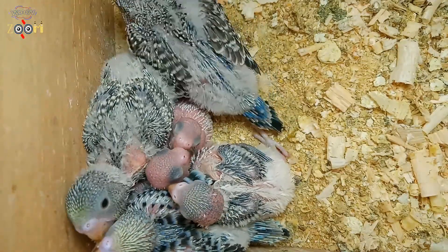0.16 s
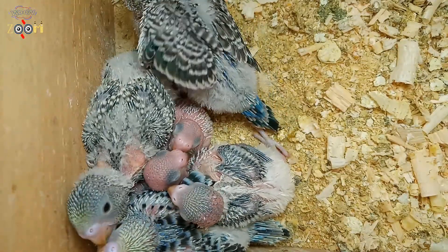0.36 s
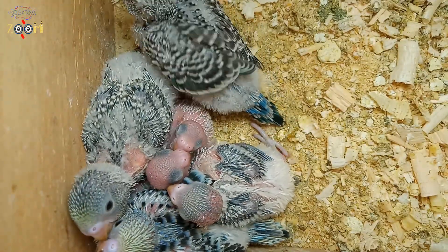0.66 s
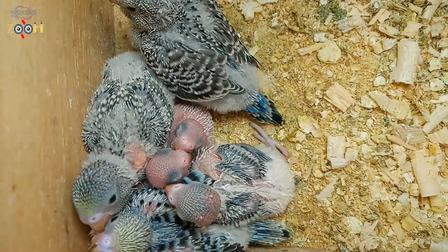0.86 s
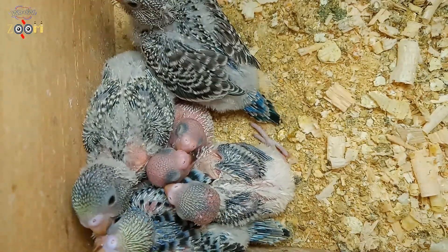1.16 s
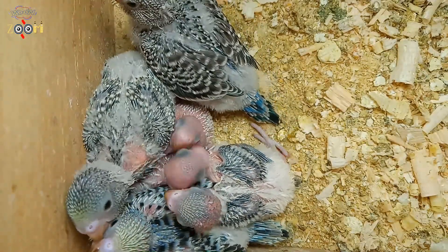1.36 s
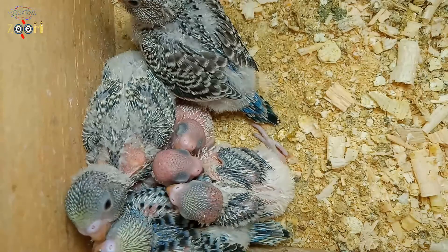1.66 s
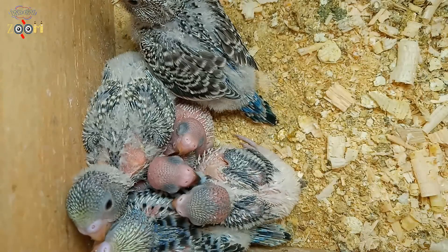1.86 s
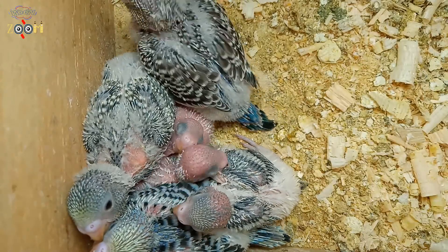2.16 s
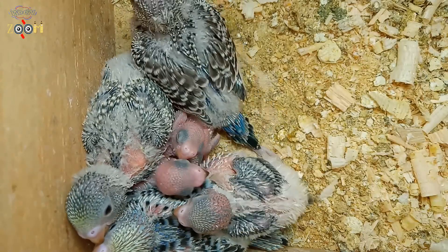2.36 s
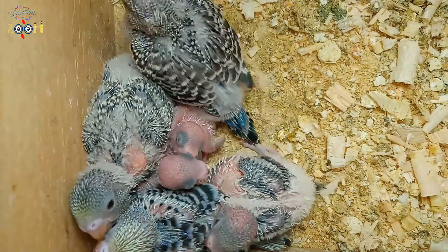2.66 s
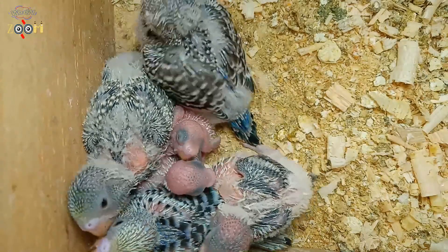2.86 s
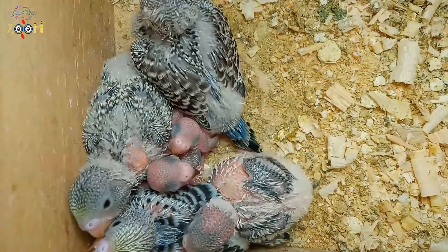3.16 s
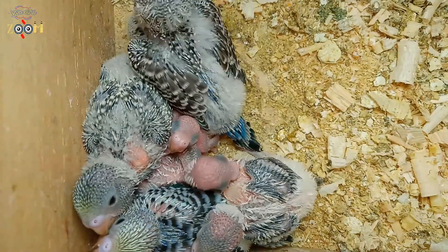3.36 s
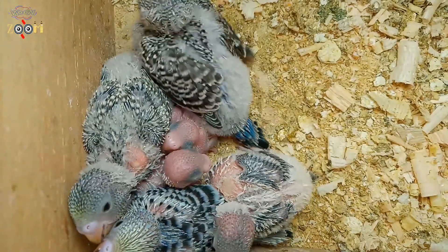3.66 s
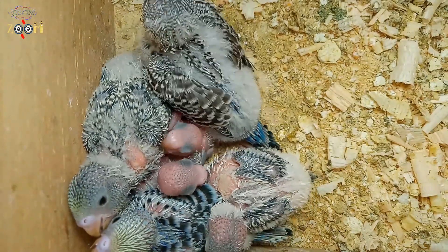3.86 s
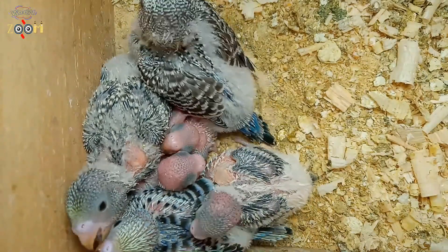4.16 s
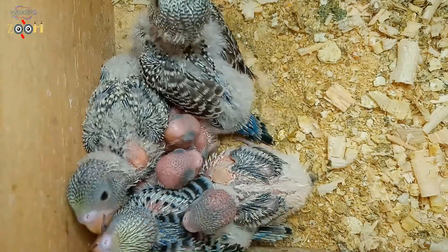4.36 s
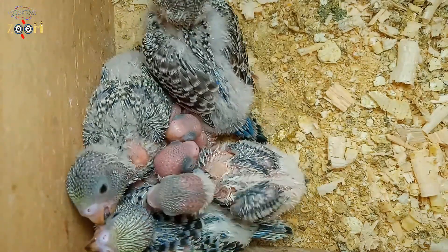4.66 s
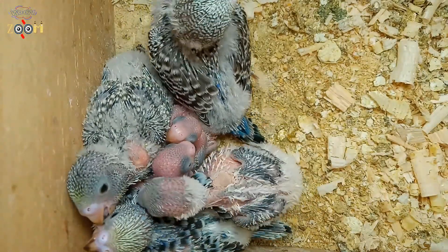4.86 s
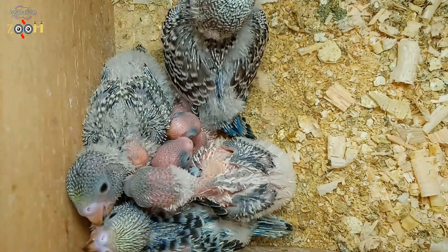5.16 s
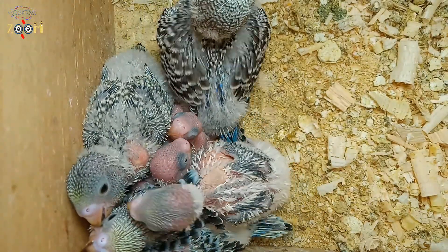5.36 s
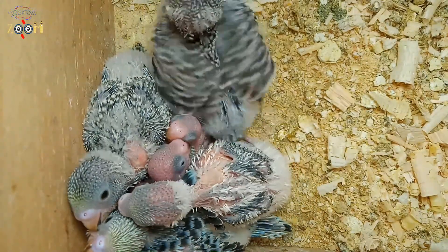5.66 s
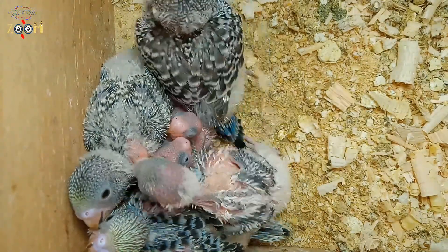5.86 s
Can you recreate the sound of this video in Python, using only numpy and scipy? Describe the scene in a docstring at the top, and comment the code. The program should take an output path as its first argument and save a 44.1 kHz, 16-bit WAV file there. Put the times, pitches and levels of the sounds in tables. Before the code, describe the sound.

A phone placed close in a nest box picks up young budgies: a clipped warble early on, dull claw taps, soft sine-like chick peeps, low croaks with scratching in shavings, then a livelier mix of sharp chirps and harsh little squawks. Behind them a reverberant flock whistles and chatters, growing busier, above a droning building rumble. The highest treble is dulled.

```python
"""Budgies in a bare, echoing bird room, heard from inside a wooden nest box by a phone.
Far whistles and chatter ring from the start, heard only as echo, over air noise and a swelling low rumble.
A bird close by squawks, then warbles (0.4-1 s); claws scrabble and tap the box from 1.4 s, as filtered
grains and ringing walls. A chick peeps in gliding sine tones (2.3-3.1 s), low warbled notes and more
scrabbling follow, and from 4.4 s warble, peeps and squawks alternate, with two last taps at the end."""
import sys
import numpy as np
from scipy import signal
from scipy.fft import rfft, irfft, next_fast_len
from scipy.io import wavfile
from scipy.ndimage import uniform_filter1d

SR = 44100
rng = np.random.default_rng(int(sys.argv[2]) if len(sys.argv) > 2 else 0)


def master(y):
    """Save y as 16-bit WAV."""
    cut = np.clip(np.atleast_2d(y).T, -1, 1)
    pcm = np.round(cut * 32767)  # scale
    wavfile.write(sys.argv[1], SR, pcm.astype(np.int16))


N = 265482
LEAD_S = .5  # tracks start this early, so that earlier calls still ring


def undb(db):
    """Turn decibels into an amplitude factor."""
    return 10 ** (np.asarray(db) / 20)


def colour(x, points):
    """Filter by (frequency [Hz], gain [dB]) points joined on a log-frequency axis."""
    hz, db = np.transpose(points)
    size = next_fast_len(x.shape[-1])
    f = np.maximum(np.arange(size // 2 + 1) * SR / size, 1)
    gain = undb(np.interp(np.log(f), np.log(hz), db))
    return irfft(rfft(x, size) * gain, size)[..., :x.shape[-1]]


def add(track, s, sound):
    """Lay a sound at s seconds on a track that starts LEAD_S early."""
    i = int((s + LEAD_S) * SR)
    sound = sound[:len(track) - i]
    track[i:i + len(sound)] += sound


def note(length, hz, turn, db, second_db, third_db, rough=0., edge=0.49, shakes=500., fourth_db=0.0):
    """A syrinx tone gliding through three pitches, loudest at the turn; roughness shakes pitch and size."""
    u = np.arange(int(length * SR) + 2) / (length * SR + 2)
    turn = np.clip(turn, .1, .9)
    # random values, shakes a second, joined by straight lines
    pitch_shake, size_shake = [np.interp(u * length * shakes, np.arange(128), row)
                               for row in rng.standard_normal((2, 128))]
    glide = uniform_filter1d(np.interp(u, [0, turn, 1], hz), len(u) // 5 + 1, mode="nearest")
    pitch = glide * (1 + 0.1504 * rough * pitch_shake)
    phase = 2 * np.pi * np.cumsum(pitch) / SR
    # fourth_db is relative to the third harmonic, the others to the first
    harmonics_db = [0, second_db, third_db, third_db + fourth_db]
    tone = 0
    for k, harmonic_db in enumerate(harmonics_db, 1):
        audible = k * pitch < 10000
        tone = tone + undb(harmonic_db) * audible * np.sin(k * phase)
    # a smaller edge makes the swell squarer, a larger one steeper
    swell = np.sin(np.pi * np.interp(u, [0, turn, 1], [0, .5, 1])) ** edge
    return undb(db) * swell * (1 + rough * size_shake) * tone


def room(x, gap_s, rise_s, first_db=0):
    """Echoes after a first gap, uneven slaps at first, then dense; each band dies at its own rate."""
    # decay of the bare room: (band centre [Hz], time to fall 60 dB [s])
    band_decays = [(1000, 1.65), (2500, 2.34), (4500, 1.22), (7500, 1.2)]
    slap_db = 4.5  # spread of the slaps at the start
    t = np.arange(int(1.6 * SR)) / SR
    noise = rfft(rng.standard_normal(len(t)))
    log_hz = np.log(np.arange(len(t) // 2 + 1) * SR / len(t) + 1)
    centres = np.log([hz for hz, _ in band_decays])
    echo = 0
    for k, (_, t60) in enumerate(band_decays):
        share = np.interp(log_hz, centres, np.eye(len(centres))[k])
        echo = echo + irfft(noise * share, len(t)) * 10 ** (-3 * t / t60)
    # the near walls answer in separate slaps that blur with time
    slaps = np.interp(t * 300, np.arange(500), rng.standard_normal(500))
    echo *= undb((-0.5 + slap_db * slaps) * np.exp(-t / 0.18))
    echo *= 1 - np.exp(-t / rise_s)
    echo *= undb(first_db * np.exp(-t / .02))  # extra level for the earliest echoes
    echo = np.r_[np.zeros(int(gap_s * SR)), echo * np.sqrt(10 / SR)]
    return signal.fftconvolve(x, echo)[:len(x)]


def chick(track):
    """Thin, slightly unsteady sine whistles, most arching up to a top; too soft to wake the room."""
    # peeps: (time [s], length [s], start [Hz], top [Hz], end [Hz], place of the top [share 0-1],
    #         dip of pitch at the top [Hz], level before start and flutter [dB], swell in the fall [dB])
    peeps = [(2.289, .127, 3480, 4520, 4300, .6, 270, -36, 3),
             (2.446, .024, 4200, 4270, 3750, .4, 0, -38, 0), (2.496, .013, 3700, 3720, 3000, .2, 0, -35, 1),
             (2.893, .171, 3580, 4350, 3380, .545, 320, -35, 0),
             (4.688, .078, 3640, 4330, 4300, .9, 0, -39.5, -2),
             (4.777, .017, 4250, 4280, 3470, .3, 0, -37, 6),
             (5.278, .128, 3700, 4740, 3600, .75, 0, -40, 8),
             (5.815, .107, 4020, 4420, 3750, .82, 0, -37, 11)]
    catch_s, start_db = .015, -1.5  # width of the dip; level at the start against the top
    for s, length, start_hz, top_hz, end_hz, top, catch_hz, db, swell_db in peeps:
        t = np.arange(0, length, 1 / SR)
        fade = np.clip(np.minimum(t, length - t) / 0.0011, 0, 1)
        waver, flutter = (np.interp(t * 160, np.arange(128), row) for row in rng.standard_normal((2, 128)))
        rise = np.clip(1 - t / (top * length), 0, 1)  # 1 at the start, 0 at the top
        fall = np.clip((t / length - top) / (1 - top), 0, 1)  # 0 at the top, 1 at the end
        arch = top_hz - (top_hz - start_hz) * rise ** 2 - (top_hz - end_hz) * fall ** 2.1
        pitch = arch - catch_hz * np.exp(-((t - top * length) / catch_s) ** 2)
        pitch = pitch * (1 + .006 * waver)
        loud = undb(db + start_db * rise + swell_db * fall) * undb(2.5 * flutter)
        add(track, s, fade * loud * np.sin(2 * np.pi * np.cumsum(pitch) / SR))
    return track


def neighbour(track):
    """Sweet syrinx notes, rough when low, steep when they peak late, and throbbing harsh squawks.

    Rows of the track: as heard, as sent to the room.
    """
    # warble close by: (start [s], end [s], start [Hz], turn [Hz], end [Hz], place of the turn [share 0-1],
    #                   level of the first harmonic [dB], second harmonic against the first [dB])
    warble = [(.403, .419, 2100, 1370, 1320, .25, -32.5, -1), (.431, .442, 2950, 2850, 2500, .75, -30, -15),
              (.444, .455, 2870, 2600, 2500, .6, -33, -14), (.456, .464, 2600, 2800, 3000, .5, -36, -20),
              (.465, .479, 1740, 1800, 2200, .55, -32, 5), (.478, .497, 2250, 2500, 2880, .6, -26.5, -6),
              (.497, .508, 3000, 3300, 3400, .5, -33, -8), (.518, .531, 1060, 990, 950, .55, -29.5, -14),
              (.87, .875, 2800, 2950, 3000, .4, -26, -15), (0.885, 0.905, 2490, 2430, 2390, 0.4, -35, -15),
              (0.927, 0.954, 1720, 1740, 1650, 0.65, -33, -2), (.958, .981, 2280, 2560, 3000, .7, -18, -17),
              (.989, 1.004, 1483, 1620, 1700, .4, -34, 9), (3.527, 3.552, 790, 969, 1080, 0.45, -34, -28),
              (3.734, 3.763, 835, 1053, 868, 0.3, -32, -11), (3.954, 3.991, 783, 973, 1148, .4, -34.5, -1),
              (4.221, 4.246, 1327, 1354, 1290, 0.3, -37.5, -27),
              (4.467, 4.479, 1000, 1020, 1000, .55, -30.5, -8),
              (4.477, 4.485, 2850, 2700, 2600, .5, -31, -20),
              (4.502, 4.513, 3450, 3150, 2450, .3, -29, -18),
              (4.511, 4.535, 2420, 2630, 2450, .45, -27.5, -18),
              (4.532, 4.541, 1950, 1615, 1246, 0.7, -36, -22),
              (4.539, 4.558, 3100, 3350, 3150, .87, -10, -28), (4.562, 4.582, 1300, 950, 2200, .3, -32, -4),
              (4.833, 4.86, 2280, 2440, 1880, .2, -29.5, -30),
              (4.846, 4.859, 2750, 3100, 3400, .6, -34, -30),
              (4.862, 4.883, 2560, 2390, 2420, .6, -28.5, -30),
              (4.88, 4.894, 2450, 2880, 2900, .5, -32, -30), (4.896, 4.907, 1310, 1290, 1300, .5, -31, -10),
              (4.906, 4.927, 1480, 1800, 2160, .7, -35, 3),
              (5.258, 5.278, 1246, 1390, 1860, 0.7, -41.5, -14),
              (5.303, 5.334, 2900, 2560, 2420, .7, -26, -22), (5.329, 5.338, 2000, 1950, 1720, .4, -35, 5),
              (5.789, 5.812, 2500, 2620, 2760, .7, -27, -12),
              (5.826, 5.844, 3880, 3700, 3600, .5, -21, -25),
              (5.848, 5.866, 1430, 1400, 1330, .4, -31.5, -10),
              (5.88, 5.893, 3500, 3630, 3600, .65, -19, -12)]
    # harsh squawks close by: (time [s], length [s], pitch [Hz], level of the first harmonic [dB],
    #                          second harmonic against the first [dB])
    squawks = [(0.13, 0.013, 1400, -54.5, 5.5), (3.92, 0.052, 1702, -46.5, 2.5), (4.193, .02, 1722, -47, 6),
               (4.294, 0.011, 1550, -37, 7), (4.318, 0.0073, 1475, -44, 16), (5.487, 0.015, 1525, -26, 8),
               (5.644, 0.018, 1245, -36.5, 12)]
    aimed_db = -15  # warble above this level is aimed at the phone: the room gets no more of it
    # third harmonic against the second; a squawk's is given at 1 kHz and rises with pitch
    sweet_third_db, squawk_third_db, squawk_db_per_khz = -10.5, -10, 25.5
    rasp_hz, rasp_depth = 95, .7
    for s, end, start_hz, turn_hz, end_hz, turn, db, over_db in warble:
        low = turn_hz < 1100
        croak = .12 + .25 * low
        swell = .4 + 22 * max(turn - .7, 0)
        sung = note(max(end - s, 1 / 250), [start_hz, turn_hz, end_hz], turn, db, over_db,
                    over_db + sweet_third_db, rough=croak, edge=swell, fourth_db=-19)
        add(track[0], s, sung)
        # the room gets 4 dB less of the low croaks
        add(track[1], s, sung * undb(min(aimed_db - db, 0) - 4 * low))
    for s, length, hz, db, over_db in squawks:
        third_db = over_db + squawk_third_db + squawk_db_per_khz * (hz / 1000 - 1)
        squawk = note(length, [hz, hz, hz], .1, db, over_db, third_db, rough=.55, edge=.7, shakes=1400.)
        throb = 1 + rasp_depth * np.sin(2 * np.pi * rasp_hz * np.arange(len(squawk)) / SR)
        squawk = squawk * throb / (1 + rasp_depth)
        for row in track:
            add(row, s, squawk)
    return track


def far_birds(size):
    """Loud calls from three perches with echoes of their own, over the rough chatter of the flock."""
    # far calls, levels before the room: (time [s], start [Hz], end [Hz], level of the first harmonic [dB],
    #                                     second harmonic against the first [dB])
    calls = [(-.1, 2480, 2860, -43.5, 5.5), (-.15, 3280, 3500, -49, 6.5), (-.06, 1070, 1088, -33, -9.5),
             (.14, 2132, 2447, -34, 0), (.525, 2457, 2666, -28.5, -17), (.84, 2990, 2515, -34.5, -37),
             (.985, 3286, 2664, -48, -41.5), (1.01, 1173, 1368, -34.5, -23), (1.38, 1390, 1720, -36, -31),
             (1.49, 2049, 1964, -33, 6.5), (1.5, 2403, 2770, -35.5, -0.5), (1.74, 2880, 3140, -29, -9.5),
             (1.74, 2324, 2413, -31.5, -7), (1.748, 3150, 3610, -25, -16), (1.8, 3680, 4104, -27, -26),
             (1.835, 3130, 3907, -32.5, -20), (1.82, 1510, 1198, -40, -21), (1.81, 2117, 1848, -30, -8.5),
             (2.0, 3167, 3680, -36, -6), (2.2, 4150, 4680, -41, -20), (2.17, 1822, 1994, -35, 1),
             (2.283, 3115, 2760, -26.5, -1), (2.4, 2750, 2320, -29, -5), (2.432, 2500, 2468, -21.5, -2),
             (2.56, 2030, 1738, -30.5, -4), (2.79, 4250, 3820, -34.5, -20), (2.83, 3580, 3323, -27, -8.5),
             (2.85, 2935, 2852, -24, -17), (2.86, 2707, 2324, -34, -26.5), (3.07, 2680, 2960, -27.5, -6),
             (3.125, 3540, 3435, -24, -3), (3.165, 3840, 3470, -27, -12), (3.18, 2226, 2387, -31, -1),
             (3.3, 1960, 1776, -38.5, -13.5), (3.45, 1800, 2226, -33.5, -17), (3.72, 2542, 2420, -29, -15),
             (3.91, 3140, 3690, -31, -6.5), (3.98, 722, 1009, -39.5, 8.5),
             (4.002, 3160, 3024, -19.5, -12.5), (4.05, 2962, 2534, -26.5, -9),
             (4.175, 3460, 2694, -30, -11), (4.57, 2935, 2440, -40.5, -1.5), (4.575, 3490, 2982, -27, -12),
             (4.72, 2213, 2510, -41, 7), (4.9, 3045, 2524, -33.5, -8.5), (4.92, 4224, 4150, -30.5, -44),
             (5.08, 1960, 2102, -29, -9.5), (5.102, 2756, 2897, -22.5, -27.5),
             (5.15, 3160, 2937, -27.5, -18.5), (5.36, 2727, 2204, -28.5, -7.5),
             (5.48, 3630, 3690, -24.5, -10), (5.485, 3230, 2427, -30, 1), (5.66, 2472, 3225, -31, -14),
             (5.92, 3650, 2832, -21.5, -21), (5.885, 2400, 2880, -19.5, -6.5)]
    flock_db, calls_a_second = -49.5, 90  # level of the softest chatter, before the room
    whistle_s, slide_s_per_octave = 0.02554, .12  # length of a level call; sliding ones last longer
    peak_share, third_db = .12, -2.5  # where a call is loudest; third harmonic against the second
    perches = np.zeros((3, size))
    chance = rng.random((int(calls_a_second * size / SR), 5))
    for when, pitch, glide, loud, long in chance:
        hz = 1000 * undb(11 * pitch ** .7)
        chirp = note(0.0042 + 0.0366 * long, [hz, hz * (0.87 + .45 * glide), hz], 0.577,
                     flock_db + 6 * loud, -13.5, -25.0, rough=0.648)
        add(perches[0], when * size / SR - LEAD_S, chirp)
    for k, (s, start_hz, end_hz, db, over_db) in enumerate(calls):
        length = whistle_s + slide_s_per_octave * abs(np.log2(end_hz / start_hz))
        # level whistles are clean, sliding calls rasp
        rough = min(.07 + 4 * abs(np.log(end_hz / start_hz)), .6)
        call = note(length, [start_hz, (start_hz + end_hz) / 2, end_hz], peak_share, db, over_db,
                    over_db + third_db, rough=rough)
        add(perches[k % 3], s, call)
    return sum(room(perch, 0, 0.008, first_db=1) for perch in perches)


def claws(track):
    """A tap sets the box walls ringing in damped sines; scrabbling is a run of uneven dull grains."""
    # claws on the box: (time [s], level before tap_gain_db [dB])
    taps = [(1.811, -50), (1.956, -54), (2.198, -47.5), (2.496, -47), (2.718, -50), (2.898, -54),
            (3.022, -49), (3.141, -54), (3.323, -44.5), (5.7, -53.5), (5.984, -50)]
    # claws in the shavings: (time [s], length [s], RMS level with its short tail [dB])
    scrabbles = [(1.368, 0.045, -47.5), (3.532, 0.032, -51), (3.681, .09, -41), (3.887, .14, -41),
                 (4.035, 0.16, -50)]
    # relative tint of the scrabbling: (frequency [Hz], gain [dB])
    scrape_tint = [(400, -44), (650, -4.5), (1000, -2.5), (1400, -10.5), (2500, -7.5), (6000, -33.5)]
    # box wall resonances: (frequency [Hz], mean level against the tap [dB], time to fall 60 dB [s])
    walls = [(688, 4, 0.06), (940, 5.5, 0.034), (1305, 5, 0.024)]
    scrapes_a_second, tap_gain_db = 700, 5.5
    for s, length, db in scrabbles:
        when, size = rng.random((2, int(length * SR)))
        grains = (when < scrapes_a_second / SR) * (size - .5) * np.hanning(len(when)) ** 0.084
        grains = colour(np.r_[grains, np.zeros(500)], scrape_tint)
        add(track, s, undb(db) * grains / grains.std())
    t = np.arange(int(.12 * SR)) / SR
    attack = np.minimum(t / 0.0001, 1)
    for (s, db), spread in zip(taps, rng.standard_normal((len(taps), 3))):
        ring = 0
        for (hz, wall_db, t60), deviation in zip(walls, spread):
            decay = 10 ** (-3 * t / t60)
            ring = ring + undb(wall_db + 1.5 * deviation) * np.sin(2 * np.pi * hz * t) * decay
        add(track, s, undb(db + tap_gain_db) * attack * ring)
    return track


def house():
    """Filtered-noise air of the building and two droning noise bands, swelling together."""
    # swell of the rumble, used relative to the mean of its points: (time [s], level [dB])
    rumble = [(0, -53), (.55, -49.5), (.85, -42.5), (1.399, -46), (2.2, -41), (2.7, -47), (3.5, -45),
              (4.402, -47.5), (5.497, -50.5), (6.02, -50.5)]
    # relative tint of the air noise: (frequency [Hz], gain [dB])
    air_tint = [(94, -37), (160, 1.5), (301, -2), (353, -4), (425, -13.5), (504, -18), (665, -10.5),
                (828, -11.5), (1200, -14), (1560, -40), (2640, -120)]
    # a distant motor shaking the floor: (centre [Hz], width [Hz])
    drones = [(58, 16), (120, 46)]
    # air, low drone, high drone: (RMS level at the mean rumble [dB], how strongly it follows the swell [dB/dB])
    mix = [(-48.5, 0.38), (-59.5, 1.2), (-49, 1.25)]
    s, rumble_db = np.transpose(rumble)
    swell_db = np.interp(np.arange(N) / SR, s, rumble_db - rumble_db.mean())
    noise = rng.standard_normal((3, N))
    layers = [colour(noise[0], air_tint)]
    for row, (hz, width) in zip(noise[1:], drones):
        band = signal.butter(2, [hz - width / 2, hz + width / 2], "band", fs=SR, output="sos")
        layers.append(signal.sosfilt(band, row))
    return sum(x / x.std() * undb(db + follows * swell_db) for x, (db, follows) in zip(layers, mix))


def scene():
    """Sum all birds and claws, put the near bird to the right and lay the house under both channels."""
    # the first echoes carry little of the low notes: (frequency [Hz], gain [dB])
    near_walls = [(1300, -6), (2200, 0)]
    # relative tint of the difference between the two ports: (frequency [Hz], gain [dB])
    port_tint = [(100, -45), (900, -15), (2600, 0), (6000, -9)]
    lead = int(LEAD_S * SR)
    size = N + lead
    near, sent = neighbour(np.zeros((2, size)))
    first_echoes = undb(-0.5) * room(colour(sent, near_walls), 0.0065, 0.00084)
    later_echoes = undb(-10) * room(sent, 0.031, 0.00097)
    echoes = first_echoes + later_echoes
    middle = near + echoes + chick(np.zeros(size)) + far_birds(size) + claws(np.zeros(size))
    # only the near bird and its echoes sit to the right
    side = undb(-20) * colour(near + .3 * echoes, port_tint)
    return np.array([middle - side, middle + side])[:, lead:] + house()


def record(dry):
    """The box and the phone dull the treble; a steep low-pass cuts the top."""
    # treble response: (frequency [Hz], gain [dB])
    treble = [(3000, 0.5), (3600, -1), (4500, -5.5), (5500, -23), (6500, -18.5), (7500, -24.5), (8500, -42)]
    top_hz = 8600
    low_pass = signal.ellip(8, .2, 70, top_hz, fs=SR, output="sos")
    return signal.sosfilt(low_pass, colour(dry, treble))


dry = scene()
out = record(dry)
master(out)
```